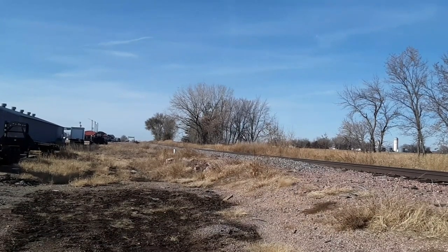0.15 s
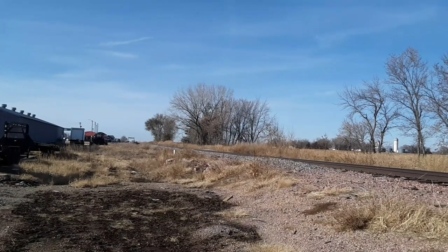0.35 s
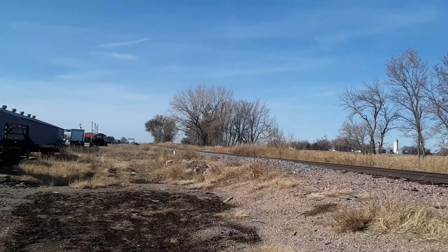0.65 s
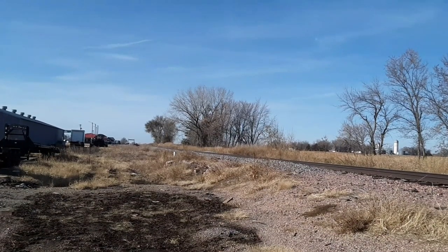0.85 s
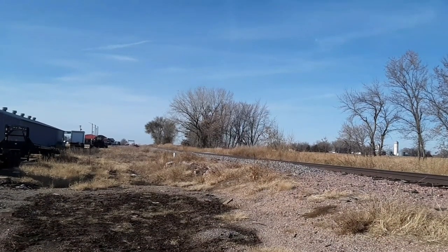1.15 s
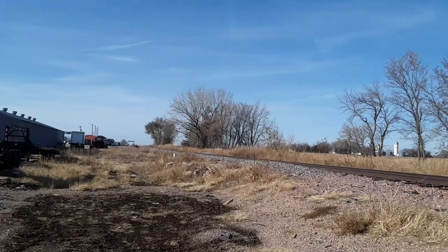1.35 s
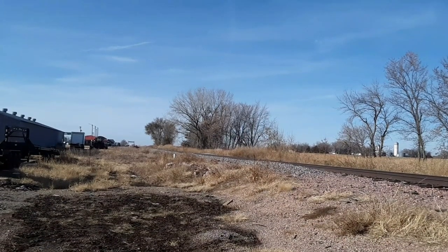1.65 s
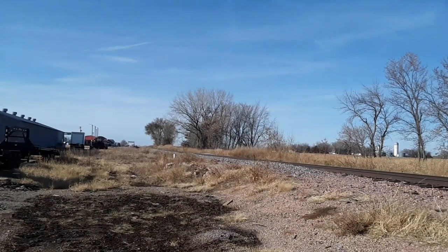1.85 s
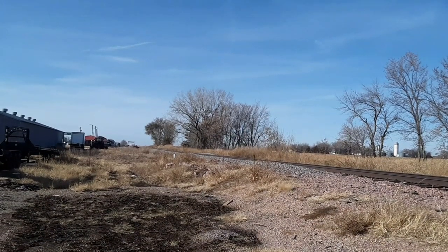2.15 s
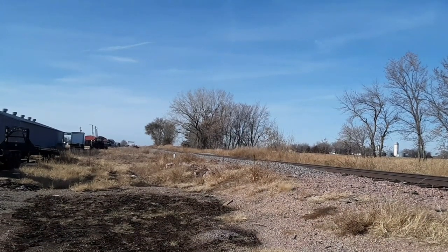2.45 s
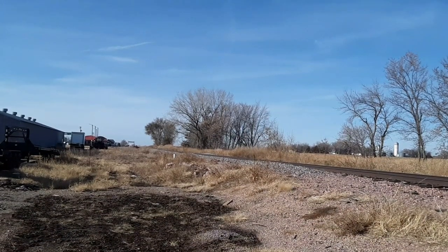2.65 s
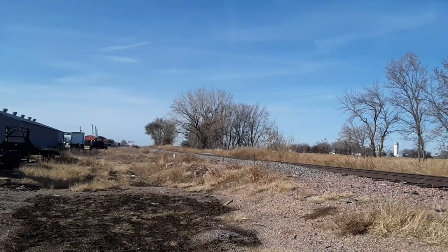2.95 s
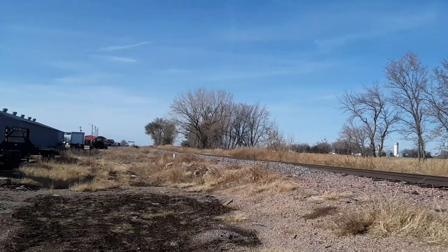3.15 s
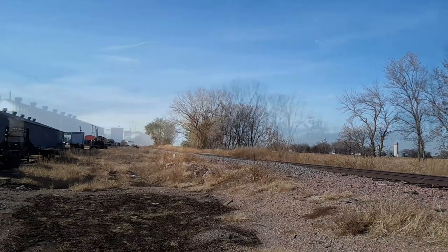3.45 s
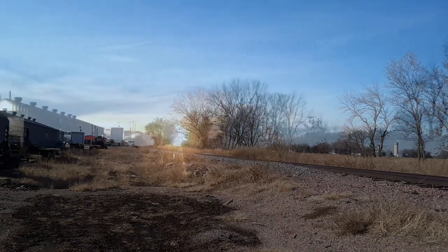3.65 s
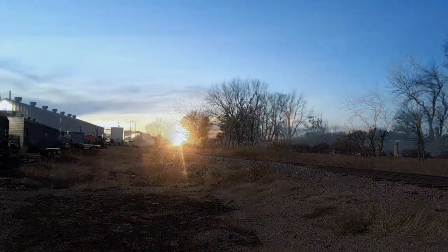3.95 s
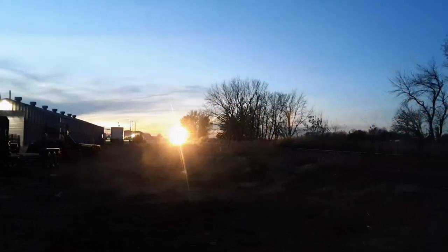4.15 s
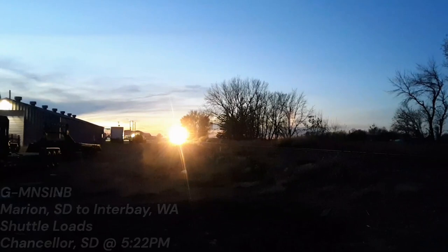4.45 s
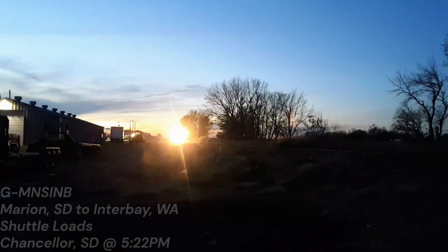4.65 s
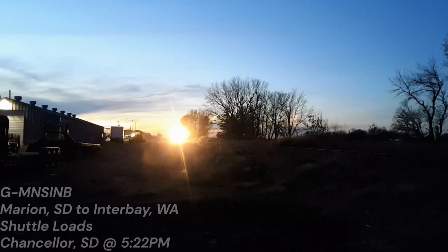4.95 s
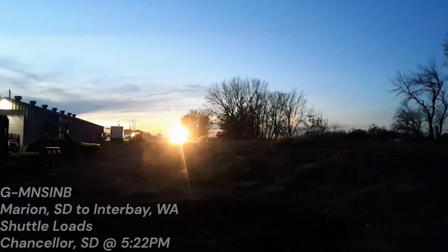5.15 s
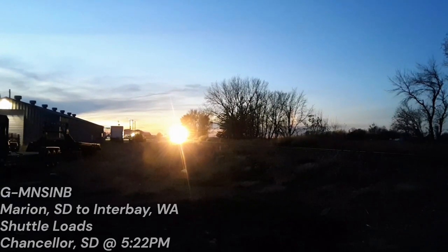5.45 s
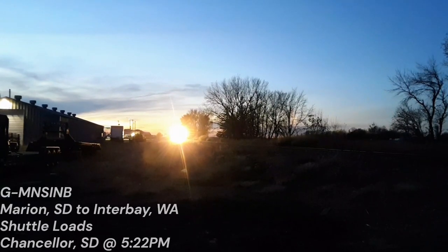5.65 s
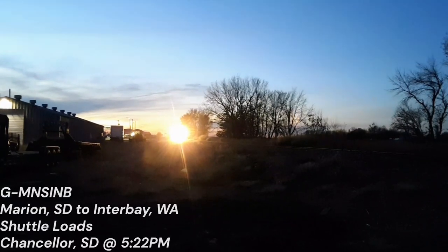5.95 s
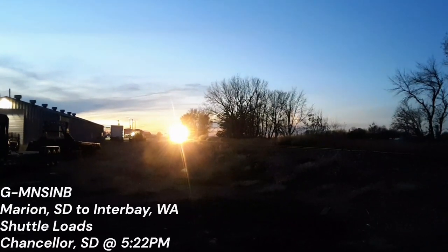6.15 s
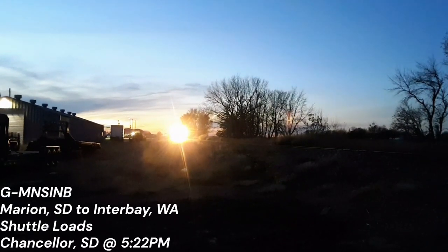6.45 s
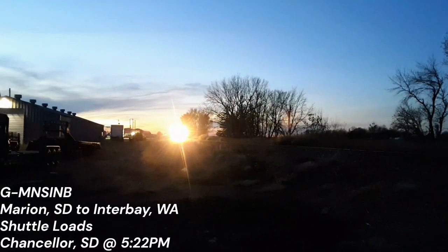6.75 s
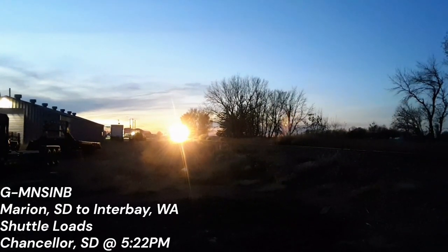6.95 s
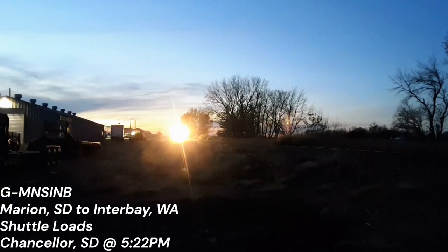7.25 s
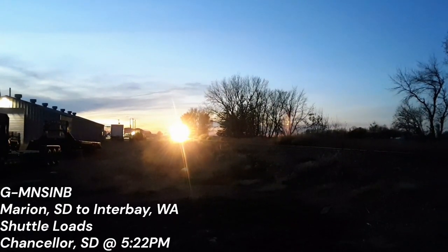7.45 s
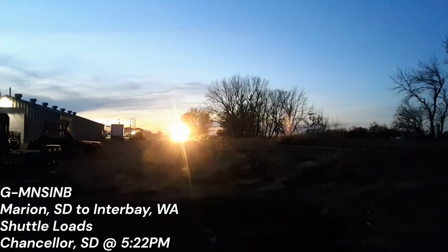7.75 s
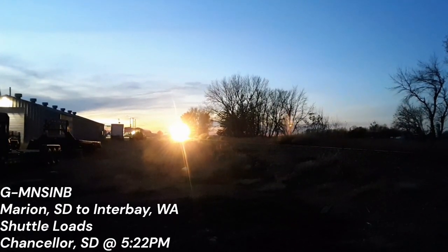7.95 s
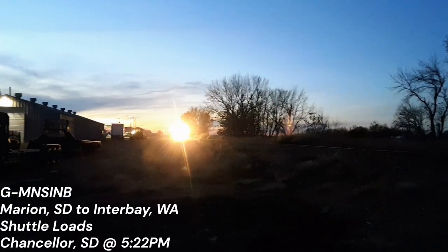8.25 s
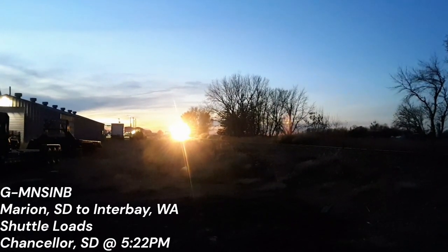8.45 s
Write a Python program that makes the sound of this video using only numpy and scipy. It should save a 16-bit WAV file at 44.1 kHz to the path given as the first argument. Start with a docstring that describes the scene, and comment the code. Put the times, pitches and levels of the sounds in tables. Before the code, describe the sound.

Open country by a railway, in stereo with faint low wind and hiss. From 0 s the tail of a freight train rolls away: a broad roar and a flat wheel pounding roughly every 0.26 s, each blow a low thud, hollow body knock, clank and trailing steel rattle. It gradually weakens and loses treble. A thin, patchy, very high flange squeal sings around 0.6-1.3 s and faintly near 2 s; short rising coupling squeaks come at 2.2 and 3.0 s. At 3.25 s a distant diesel cuts in softly, overlapping the train until that is chopped off at 4.2 s. The engine continues to 8.6 s as a steady, low throbbing hum with a wavering mid-pitched gear whine, hissy blower tones and airy roar, growing very slightly. A close insect gives dry, high, rasping buzzes at 5.5-6.0 and, longer and louder, 6.6-7.7 s.

```python
"""Over open ground, the tail of a freight train rolls away, one flat wheel pounding the rail once a turn.
Filtered noise gives its roar and the resonances struck by each blow; gliding tones give its squeals.
Then a second scene cuts in: a distant diesel locomotive hums on the orders of its cycle, with gear and
blower whines and a noisy roar. The first train is cut off a second later. In the grass close by an insect
buzzes twice, its strokes modulating noise that rings two bands of the wing."""
import sys
import numpy as np
from scipy import signal
from scipy.fft import rfft, irfft
from scipy.io import wavfile
from scipy.ndimage import uniform_filter1d, map_coordinates

SR = 44100
rng = np.random.default_rng(int(sys.argv[2]) if len(sys.argv) > 2 else 0)


def file_out(sig):
    """Save sig as 16-bit WAV at sys.argv[1]."""
    # one column per channel
    cols = np.atleast_2d(sig).T
    # limit, then scale
    lim = np.clip(cols, -1, 1)
    pcm = np.round(lim * 32767).astype(np.int16)
    wavfile.write(sys.argv[1], SR, pcm)


N = 379260
MARGIN = 2048  # samples mirrored at both ends while filtering
T = np.arange(N) / SR  # s
F = np.maximum(np.arange(N // 2 + 1) * SR / N, 1)  # Hz
WIDE_F = np.maximum(np.arange(N // 2 + MARGIN + 1) * SR / (N + 2 * MARGIN), 1)  # Hz, with the margins
TRAIN_CUT_S, ENGINE_IN_S = 4.222, 3.25


def undb(db):
    """Logarithmic level: the amplitude gain of a level in dB."""
    return np.exp(np.asarray(db) * (np.log(10) / 20))


def level(x, db):
    """Effective value: scale a signal to an rms level in dB."""
    return x * undb(db) / np.sqrt(np.mean(x ** 2))


def curves(table):
    """Linear interpolation: every column of a table after its time, sample by sample."""
    s, *columns = np.transpose(table)
    return [np.interp(T, s, column) for column in columns]


def over_hz(points, hz):
    """Logarithmic frequency scale: read (f/Hz, value) points along it."""
    p = np.array(points, float)
    return np.interp(np.log(hz), np.log(p[:, 0]), p[:, 1])


def noise():
    """White noise: equal mean power at every frequency."""
    return rng.standard_normal(N)


def walk(rate, size=32):
    """Random fluctuation: values of spread near 1, held 1 / rate s and smoothed twice."""
    hold = int(SR / size / rate)
    steps = np.repeat(rng.standard_normal(N // (size * hold) + 2), hold)
    smooth = uniform_filter1d(uniform_filter1d(steps, hold), hold)
    return 1.3 * np.interp(np.arange(N) / size, np.arange(len(steps)), smooth)


def ring(x, modes):
    """Resonance: modes (f/Hz, width/Hz, level/dB), each applied twice, with alternating sign."""
    gain = 0
    for k, (hz, width, db) in enumerate(modes):
        resonance = 1 / (1 + 1j * (F - hz * hz / F) / width) ** 2
        gain = gain + (-1) ** k * undb(db) * resonance
    return irfft(rfft(x) * gain, N)


def even(x, over_s):
    """Level compression: even out the ringing near rms 1, so that each blow sets its own strength."""
    x = level(x, 0)
    power = uniform_filter1d(x * x, int(over_s * SR))
    return level(x / np.sqrt(power + 0.086), 0)


def tone(hz):
    """Phase accumulation: a sine of rms 1 on a fixed or moving pitch, from a random phase."""
    turns = np.cumsum(hz + 0 * T) / SR + rng.random()
    return np.sqrt(2) * np.sin(2 * np.pi * turns)


def rush(colour, tilt_db, swell_db, flicker_db):
    """Broadband turbulence: coloured noise in octave bands that swell together and flicker alone."""
    spectrum = rfft(noise()) * undb(over_hz(colour, F))
    swell = swell_db * walk(3.5)
    octaves_from_1k = np.log2(np.clip(F, 62.5, 8000) / 1000)
    out = 0
    for octave in range(-4, 4):
        band = irfft(spectrum * np.clip(1 - abs(octaves_from_1k - octave), 0, 1), N)
        out = out + band * undb(octave * tilt_db + swell + flicker_db * walk(11))
    return level(out, 0)


def widen(x):
    """Edge continuation: spectrum with mirrored, faded ends, so that filters do not wrap them round."""
    ramp = np.hanning(2 * MARGIN)
    wide = np.pad(x, MARGIN, mode="reflect", reflect_type="odd")
    return rfft(wide * np.concatenate([ramp[:MARGIN], np.ones(N), ramp[MARGIN:]]))


def narrow(spectrum):
    """Inverse transform: back from a widened spectrum, without the margins."""
    return irfft(spectrum, N + 2 * MARGIN)[MARGIN:-MARGIN]


def place(make, lag, balance, scatter, tones=0 * T):
    """Directional hearing: one arrival, left lagging right by lag samples, plus opposed scattered noise."""
    direct = widen(make() + tones)
    side = widen(make()) * undb(over_hz(scatter, WIDE_F))
    half = undb(over_hz(balance, WIDE_F) / 2)
    turn = np.exp(-1j * np.pi * WIDE_F * lag / SR)
    left = narrow((direct + side) * turn * half)
    right = narrow((direct - side) / turn / half)
    return np.array([left, right])


# Level/dB of the wind on each port, and its one broad low resonance: f/Hz, width/Hz, level/dB
WIND_DB = -64
WIND_RUMBLE = [(30, 30, 0)]


def wind():
    """Incoherent pressure: low rumble, independent on each port."""
    return [level(ring(noise(), WIND_RUMBLE), WIND_DB) for _ in range(2)]


# Insect buzzes: start t/s, end t/s, level/dB, attack/s, lower band over upper level/dB,
# falter t/s, falter width/s
INSECT_BUZZES = [(5.455, 6.048, -55, 0.029, -23, 5.78, .07), (6.632, 7.668, -52.5, .008, -13.5, 7.2, .015)]
FALTER_DB, SWELL_DB_PER_S, RELEASE_DB_PER_S = -3.5, 1.5, 273
# Upper wing resonances: f/Hz, width/Hz, relative level/dB
WING_UPPER = [(13900, 500, -1.5), (14650, 500, -6.5), (15500, 600, -15.5)]
# Lower wing resonances: f/Hz, width/Hz, relative level/dB
WING_LOWER = [(11850, 250, -1), (12200, 350, -1.5)]


def insect(stroke_hz=176.5, depth=.6):
    """Stridulation: wing teeth scrape in quick strokes and ring two bands; each buzz falters once."""
    gain = np.zeros((2, N))
    for start, end, db, attack, low_db, falter, width in INSECT_BUZZES:
        swell_db = SWELL_DB_PER_S * (T - start)
        dip_db = FALTER_DB * np.exp(-((T - falter) / width) ** 2)
        release_db = RELEASE_DB_PER_S * np.maximum(T - end, 0)
        shape_db = db + swell_db + dip_db - release_db
        onset = (1 - np.exp(-np.maximum(T - start, 0) / attack)) ** 2
        gain += onset * undb([shape_db, shape_db + low_db])
    strokes = 1 + depth * tone(stroke_hz + 3.0 * walk(20)) / np.sqrt(2)
    scrape = noise() * undb(0.87 * walk(300) + 1.2 * walk(25)) * strokes
    upper = level(ring(scrape, WING_UPPER), 0)
    lower = level(ring(scrape, WING_LOWER), 0)
    return gain[0] * upper + gain[1] * lower


def rising(start, per_s):
    """Steady approach: a value that changes linearly, equal to start as the locomotive cuts in."""
    return start + per_s * (T - ENGINE_IN_S)


# Spectrum of the locomotive's roar: f/Hz, relative level/dB per Hz
ROAR_SPECTRUM = [(30, -21.5), (62, -12.5), (85, -0.5), (200, -6), (290, -15), (400, -17), (640, -11),
                 (840, -14.5), (880, -19.5), (1150, -9.5), (1500, -14), (2000, -10), (2500, -18.5),
                 (2950, -27), (3150, -33), (3550, -33), (3800, -32), (4500, -27.5), (5800, -34),
                 (6800, -62.5), (7800, -85.5)]
ROAR_RISE = (-36, 0.71)  # level/dB on cutting in, gain in dB per s


def roar():
    """Broadband radiation: noise of engine, fans and wheels, growing as the locomotive draws near."""
    return undb(rising(*ROAR_RISE)) * rush(ROAR_SPECTRUM, 0, 0.26, 1.2)


# Cooling fan tones: f/Hz, level/dB
FAN_PITCHES = [(103.3, -48.5), (317.6, -55), (636, -53.5), (688, -58), (848, -62), (952, -60)]


def fans():
    """Blade passing: steady fan tones whose level and pitch waver."""
    return sum(undb(db + 3.7 * walk(12)) * tone(hz + 2.5 * walk(15)) for hz, db in FAN_PITCHES)


# Blower harmonics: multiple of the blade rate, relative level/dB
BLOWER_HARMONICS = [(3, 0), (4, -3), (5, -4.5), (6, -12), (7, -19.5), (8, -24.5)]
BLADE_HZ, BLADE_SAG_HZ_PER_S = 421.6, .8
BLOWER_RISE = (-48, 1.5)  # level/dB on cutting in, gain in dB per s


def blower():
    """Turbulent scattering: moving air shakes the far blower tones into narrow hissy bands."""
    blade_hz = rising(BLADE_HZ, -BLADE_SAG_HZ_PER_S)
    out = 0
    for k, db in BLOWER_HARMONICS:
        shaken = tone(k * (blade_hz + 2.2 * walk(10)))
        out = out + undb(db) * (.6 + .75 * walk(55)) * shaken
    return undb(rising(*BLOWER_RISE)) * out


# Gear whine: t/s, level/dB
GEAR_LEVEL = [(3.3, -45), (3.85, -38), (4., -43.5), (4.85, -36), (5.07, -42.5), (5.25, -39), (6.3, -36),
              (6.5, -39.5), (7.45, -38), (7.75, -43.5), (8.6, -40)]
GEAR_HZ, SAG_FROM_S, SAG_HZ_PER_S = 663.0, 6.3, 1.4


def gear_mesh():
    """Tooth meshing: a whine that holds its pitch, then sags."""
    hz = GEAR_HZ - SAG_HZ_PER_S * np.maximum(T - SAG_FROM_S, 0)
    return undb(curves(GEAR_LEVEL)[0] + 1.2 * walk(20)) * tone(hz)


# Orders of the engine cycle: multiple of the cycle rate, relative level/dB
EXHAUST_ORDERS = [(6, -17), (8, -11), (9, 3.5), (10, -0.5), (11, -11), (12, -0.5), (13, -5), (14, -11.5),
                  (15, 1), (16, -16), (17, -25), (18, -9.5), (19, -11.5), (20, -19), (21, -9), (22, -16),
                  (23, -25), (24, -17), (25, -20), (26, -13.5), (30, -23), (50, -28.5), (53, -26.5)]
# Echo off the shed: t/s, lag/ms
SHED_ECHO = [(3.25, 4.5), (5.3, 4.6), (6.7, 5.1), (7.4, 6.1), (8.6, 6.3)]
CYCLE_HZ, CYCLE_START = 8.92, -.38  # cycle rate; place in the cycle at 0 s, in turns
THROB_ORDER, ORDER_SCATTER = 9.5, .09  # orders near this one beat together; phase spread, turns per order
EXHAUST_RISE = (-26.5, 0.19)  # level/dB on cutting in, gain in dB per s


def exhaust():
    """Periodic combustion: harmonics of the engine cycle, with an echo whose lag grows."""
    speed = CYCLE_HZ * (1 + 0.00066 * walk(1.5))
    turns = CYCLE_START + np.cumsum(speed) / SR
    out = 0
    for k, db in EXHAUST_ORDERS:
        offset = ORDER_SCATTER * (k - THROB_ORDER) * rng.standard_normal()
        out = out + undb(db + 1.1 * walk(6)) * np.cos(2 * np.pi * (k * turns + offset))
    lag_s = curves(SHED_ECHO)[0] / 1000
    out = out + .5 * np.interp(T - lag_s, T, out)
    return undb(rising(*EXHAUST_RISE)) * level(out, 0)


def engine_tones():
    """Superposition: the exhaust, gear, blower and fan tones add."""
    return exhaust() + gear_mesh() + blower() + fans()


DOUBLING_S = 1.74  # time for the train's distance to double from its value at 0 s


def fading(start, per_doubling):
    """Distance law: a value that changes by a fixed step each time the train's distance doubles."""
    return start + per_doubling * np.log2(1 + T / DOUBLING_S)


# Spectrum of the rolling roar: f/Hz, relative level/dB per Hz
ROLL_SPECTRUM = [(30, -61), (67, -5), (117, -1.5), (284, -5.5), (432, -8.5), (600, -16), (1260, -23),
                 (1700, -18), (1900, -12), (2300, -23), (3600, -25.5), (5300, -27), (6200, -34),
                 (7600, -59), (9400, -57.5), (11000, -58), (15500, -70)]
# Each as (value at 0 s, change per doubling): level/dB; treble tilt in dB per octave
ROLL_FADE, TILT_FADE = (-24.5, -6), (0.62, -0.79)


def rolling_roar():
    """Rolling contact: broadband noise that weakens and loses treble as the train draws away."""
    return undb(fading(*ROLL_FADE)) * rush(ROLL_SPECTRUM, fading(*TILT_FADE), 0.33, 0.8)


# Flange squeal: t/s, f/Hz, level/dB
FLANGE_SQUEAL = [(.4, 5260, -60), (.62, 5250, -54), (.81, 5198, -47), (.95, 5256, -46), (1.17, 5262, -46),
                 (1.4, 5258, -59), (1.95, 5258, -52), (2.65, 5260, -58), (2.8, 5260, -72)]
# Short squeaks of the couplings: t/s, start f/Hz, end f/Hz, level/dB, length/s
COUPLING_SQUEAKS = [(2.172, 1830, 1880, -34.5, 0.053), (3.046, 1500, 1610, -43, 0.036)]


def squeal():
    """Stick-slip friction: a flange sings thinly and patchily against the rail; couplings squeak."""
    hz, db = curves(FLANGE_SQUEAL)
    out = undb(db + 2.2 * walk(12) + 1.5 * walk(60)) * tone(hz + 5.0 * walk(60))
    for s, start_hz, end_hz, db, length in COUPLING_SQUEAKS:
        glide = np.interp(T, [s - length, s + length], [start_hz, end_hz])
        pulse = undb(db + 3.0 * walk(120)) * np.exp(-((T - s) / length) ** 2)
        out += pulse * tone(glide + 25.0 * walk(150))
    return out


# Blows of the flat wheel: t/s, thud level/dB, knock level/dB, rattle level/dB, length/s
WHEEL_BLOWS = [(-.04, -24, -20, -38, 0.034), (0.207, -20.5, -23, -34, 0.036),
               (0.465, -21.5, -21.5, -35, 0.029), (0.73, -24.5, -25, -40.5, 0.041),
               (0.996, -25, -24.5, -40, 0.04), (1.255, -29, -22, -38, 0.029),
               (1.519, -26.5, -23, -40.5, 0.027), (1.786, -28, -25.5, -41.5, 0.031),
               (2.06, -28, -29.5, -43.5, 0.043), (2.316, -30.5, -28, -49.5, 0.034),
               (2.574, -26, -29.5, -48.5, 0.026), (2.85, -28.5, -32, -48, 0.038),
               (3.105, -26, -29.5, -52, 0.021), (3.379, -26, -28.5, -51, 0.04),
               (3.65, -35, -38.5, -49.5, 0.042), (3.912, -27, -32.5, -47, 0.037),
               (4.161, -28.5, -30, -46.5, 0.032)]
THUD, KNOCK, RATTLE = 1, 2, 3  # level columns of the blows


def blow_envelope(column, late_s, rise, fall):
    """Extended source: the wagon's length smears each blow into a quick rise, a shoulder and a fall."""
    out, since = np.zeros(N), T - late_s
    for blow in WHEEL_BLOWS:
        near = slice(max(int((blow[0] - .15) * SR), 0), int((blow[0] + .5) * SR))
        u = (since[near] - blow[0]) / blow[-1]  # time in blow lengths
        before = np.exp(-abs(u / rise) ** 2.6)
        after = 1 / (1 + abs(u / fall) ** 2.25)
        out[near] += undb(blow[column]) * np.where(u < 0, before, after)
    return out


# Track bed resonances: f/Hz, width/Hz, relative level/dB
TRACK_MODES = [(83.2, 20.6, 0), (127.7, 60, -1)]


def track_thud():
    """Impact excitation: each blow rings the track bed."""
    return even(ring(noise(), TRACK_MODES), 0.041) * blow_envelope(THUD, -0.0038, rise=1.08, fall=1.4)


# Wagon body resonances: f/Hz, width/Hz, relative level/dB
BODY_MODES = [(178, 115, -5.5), (218, 76, 5), (295.6, 45, 3)]
# Wagon side resonances: f/Hz, width/Hz, relative level/dB
SIDE_MODES = [(364, 118, 2.5), (498, 150, -6.5), (717, 300, -12)]
SIDES_FADE = (5.8, -8.5)  # sides over body: level/dB at 0 s, dB per doubling


def body_knock():
    """Structure-borne sound: one jolt rings the wagon body and its sides together."""
    jolt = noise()
    sides = undb(fading(*SIDES_FADE)) * level(ring(jolt, SIDE_MODES), 0)
    body = level(ring(jolt, BODY_MODES), 0) + sides
    return even(body, 0.027) * blow_envelope(KNOCK, 0.0034, rise=1.0, fall=0.8)


# Wheel rim resonances: f/Hz, width/Hz, relative level/dB
RIM_MODES = [(734, 490, -1.5), (1055, 920, -7), (1870, 590, 0.5)]
CLANK_FADE = (6.16, -1.55)  # clank over rattle: level/dB at 0 s, dB per doubling


def rim_clank():
    """Modal ringing: each blow sounds the broad resonances of the wheel rim."""
    clank = level(ring(noise(), RIM_MODES), 0) * blow_envelope(RATTLE, 0.0051, rise=0.73, fall=2.45)
    return undb(fading(*CLANK_FADE)) * clank


# Loose steel resonances: f/Hz, width/Hz, relative level/dB
STEEL_MODES = [(4000, 1050, 1), (5260, 2310, -2), (5946, 1500, -0.5), (9040, 1500, -36)]
RATTLE_LATE_S = (0.013, 0.009)  # the rattle trails the blow: delay at 0 s, more per doubling


def steel_rattle():
    """Repeated contact: flickering noise rings loose steel, trailing each blow."""
    steel = level(ring(noise() * undb(1.33 * walk(90)), STEEL_MODES), 0)
    return steel * blow_envelope(RATTLE, fading(*RATTLE_LATE_S), rise=0.98, fall=3.05)


# Side panel resonances: f/Hz, width/Hz, relative level/dB
PANEL_MODES = [(2880, 1500, -3), (3650, 710, 4), (13500, 3300, -28)]
PANEL_FADE = (-3.5, -1.9)  # panels over rattle: level/dB at 0 s, dB per doubling


def panels():
    """Forced vibration: side panels rattle after each blow and hum between blows."""
    rattle = blow_envelope(RATTLE, fading(*RATTLE_LATE_S), rise=0.66, fall=2.13)
    hum = undb(fading(*ROLL_FADE) - 21.0)
    ringing = level(ring(noise() * undb(2.1 * walk(90)), PANEL_MODES), 0)
    return undb(fading(*PANEL_FADE)) * (rattle + hum) * ringing


def train():
    """Superposition: the rolling roar and the four responses to the flat wheel add."""
    return rolling_roar() + track_thud() + body_knock() + rim_clank() + steel_rattle()


# Left over right, train: f/Hz, level/dB
TRAIN_SIDE = [(60, 0), (380, 1), (1290, -2), (2380, 0.5), (4400, 0), (5800, 8.5), (7200, 9), (8500, 19),
              (10000, 17.5), (11000, 7), (15000, -2)]
# Left over right, panels, where the housing shades the right port: f/Hz, level/dB
PANEL_SIDE = [(2000, 9.3), (2900, 12.5), (4000, 2), (12000, 5)]
# Left over right, locomotive: f/Hz, level/dB
ENGINE_SIDE = [(60, 0.7), (380, 0.5), (1000, -.6), (2800, -0.1), (3600, 3), (4600, 1.6), (8000, 0)]
# Left over right, insect: f/Hz, level/dB
INSECT_SIDE = [(12000, -1.5), (14500, 1.8)]
# Scattered sound over the direct arrival, train and panels: f/Hz, level/dB
TRAIN_DIFFUSE = [(60, -39), (400, -15), (1200, -4), (2600, -5), (4500, -8), (6000, -5), (8000, 2)]
# Scattered over direct, locomotive roar: f/Hz, level/dB
ENGINE_DIFFUSE = [(60, -14.5), (400, -15), (1200, -7), (2200, -13), (3200, -1.5), (4600, -9), (6000, -11)]
# Scattered over direct, insect: f/Hz, level/dB
INSECT_DIFFUSE = [(12000, -5), (14500, -11)]
LAG_FADE = (11.92, -2.6)  # left port's lag in samples as the train's bearing closes: at 0 s, per doubling
ENGINE_LAG, INSECT_LAG = -2.7, 24.6  # samples by which the left port lags
CUT_IN_DB, SETTLE_S = -3, 0.23  # the locomotive comes in softer and settles


def scene():
    """Superposition: two places on the line, overlapping for a second, over the wind."""
    wagons = place(train, 0, TRAIN_SIDE, TRAIN_DIFFUSE, squeal())
    left, right = wagons + place(panels, 0, PANEL_SIDE, TRAIN_DIFFUSE)
    late_left = map_coordinates(left, [np.arange(N) - fading(*LAG_FADE)], order=3)
    first = np.array([late_left, right])
    second = place(roar, ENGINE_LAG, ENGINE_SIDE, ENGINE_DIFFUSE, engine_tones())
    second = second + place(insect, INSECT_LAG, INSECT_SIDE, INSECT_DIFFUSE)
    first_on = np.clip((TRAIN_CUT_S - T) / 0.0048, 0, 1)
    settling = undb(CUT_IN_DB * np.exp(-abs(T - ENGINE_IN_S) / SETTLE_S))
    second_on = np.clip((T - ENGINE_IN_S) / 0.0057, 0, 1) * settling
    return first * first_on + second * second_on + wind()


# Microphone response: f/Hz, level/dB
CAPSULE_RESPONSE = [(6000, 0.26), (6800, 1.5), (7700, -8.5), (9000, -1.5), (10800, -4.5), (11500, -1.3)]
HISS_DB, TOP_HZ = -74.5, 15800  # hiss before the top is cut; cutoff frequency


def record(dry):
    """Transducer response: the capsule colours the treble and hisses faintly; the top is cut."""
    response = undb(over_hz(CAPSULE_RESPONSE, WIDE_F))
    heard = np.array([narrow(widen(x) * response) for x in dry])
    heard = heard + undb(HISS_DB) * rng.standard_normal(dry.shape)
    return signal.sosfilt(signal.ellip(10, .2, 70, TOP_HZ, fs=SR, output="sos"), heard)


dry = scene()
out = record(dry)
file_out(out)
```